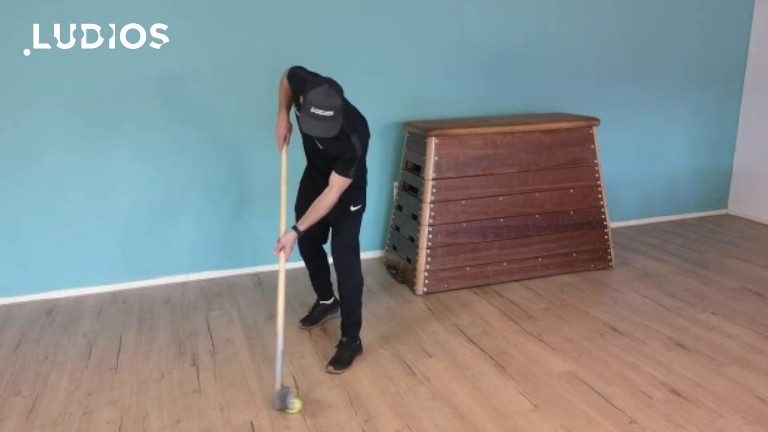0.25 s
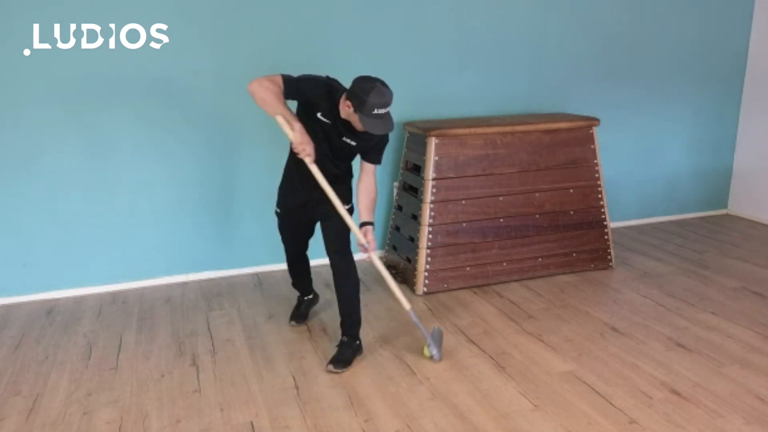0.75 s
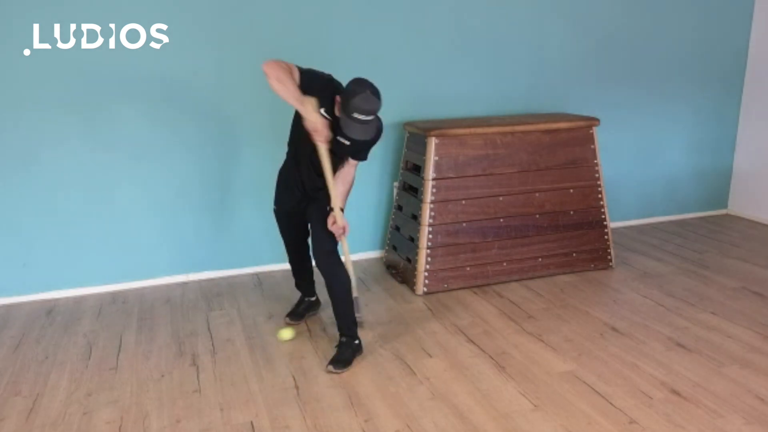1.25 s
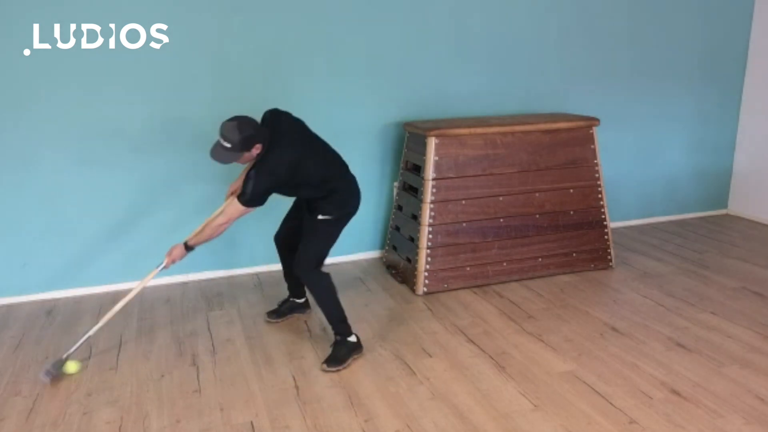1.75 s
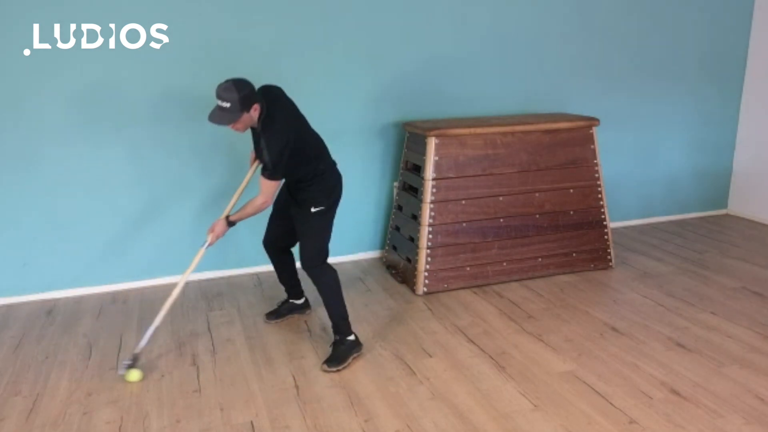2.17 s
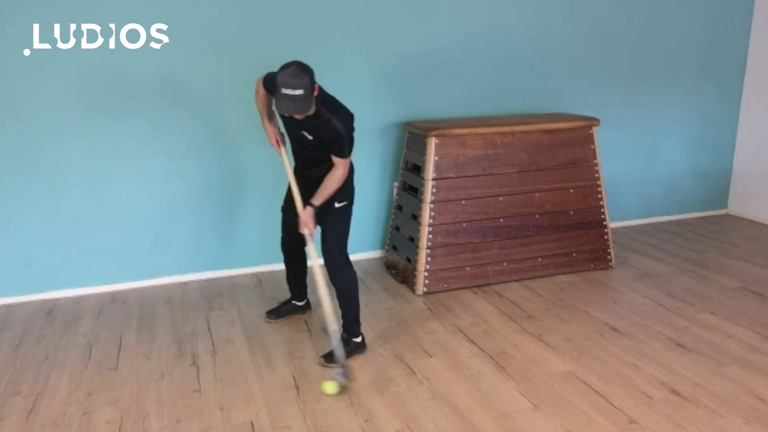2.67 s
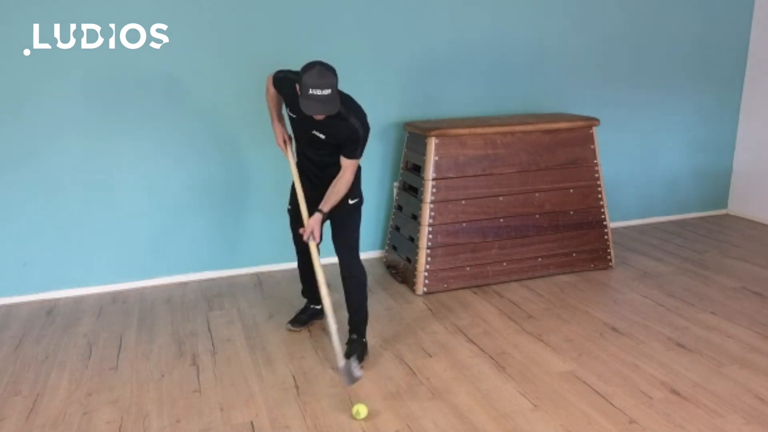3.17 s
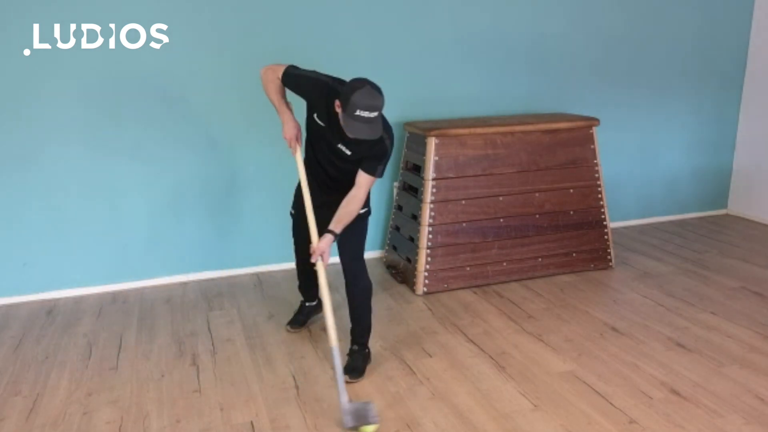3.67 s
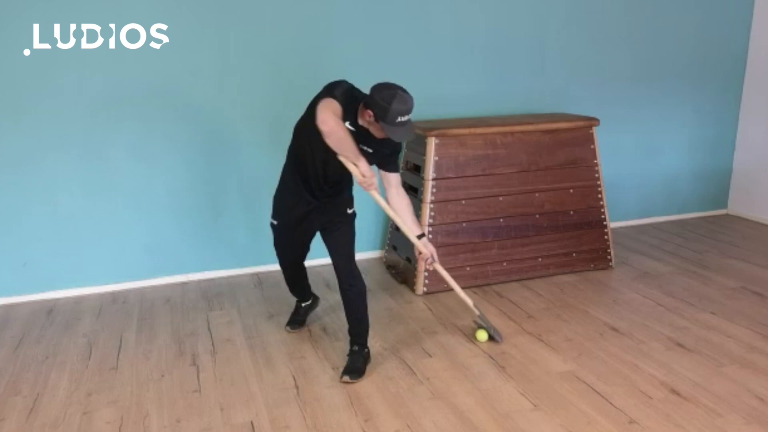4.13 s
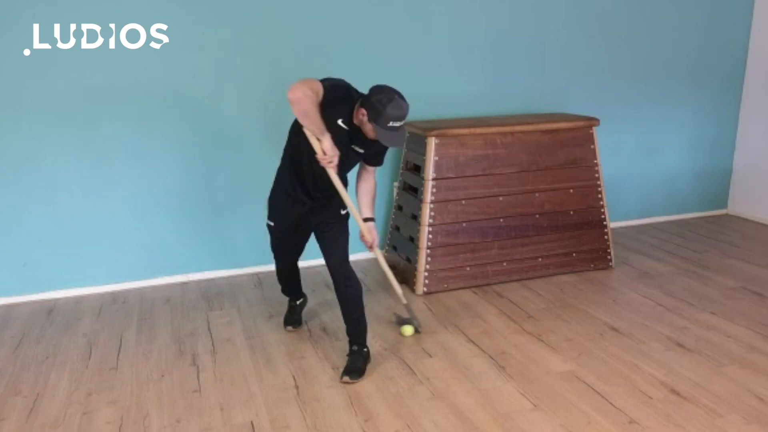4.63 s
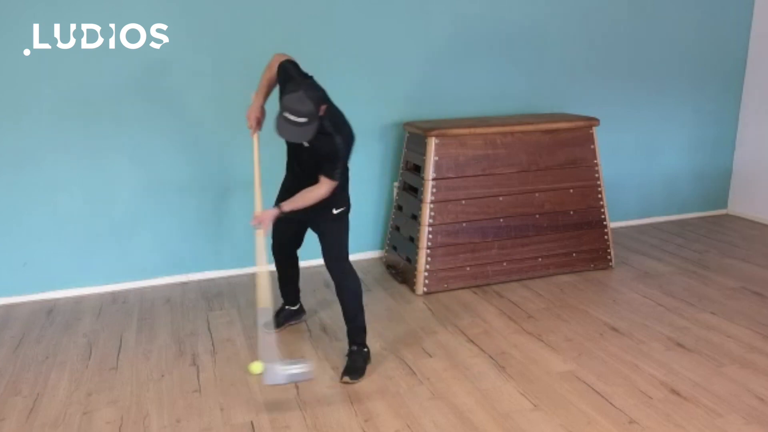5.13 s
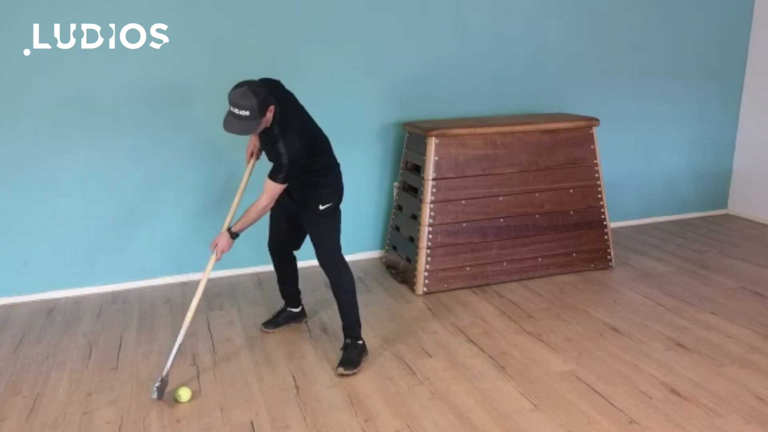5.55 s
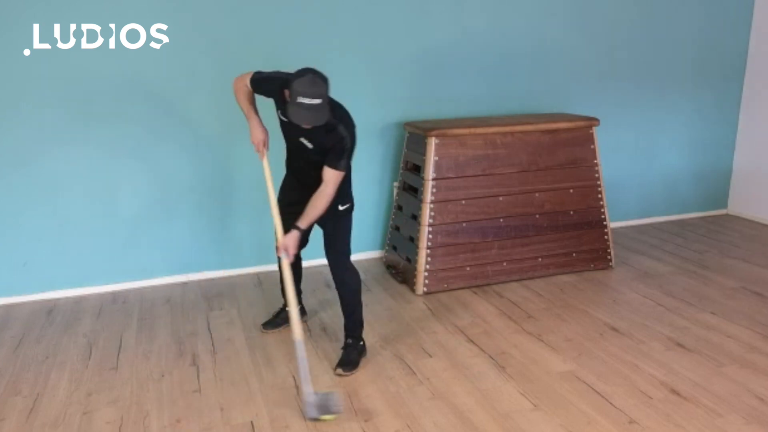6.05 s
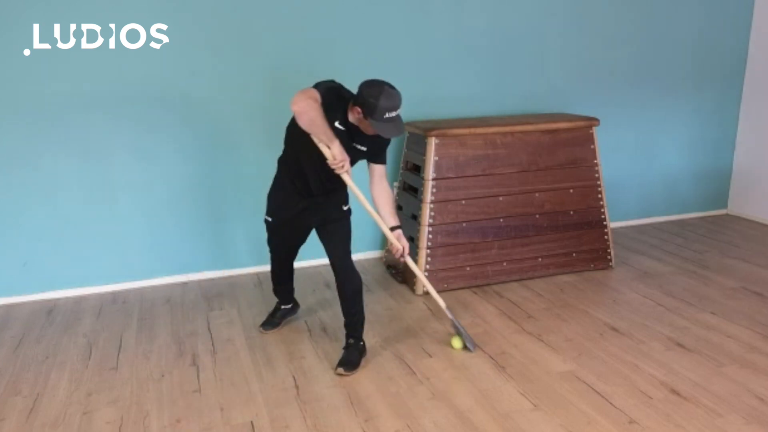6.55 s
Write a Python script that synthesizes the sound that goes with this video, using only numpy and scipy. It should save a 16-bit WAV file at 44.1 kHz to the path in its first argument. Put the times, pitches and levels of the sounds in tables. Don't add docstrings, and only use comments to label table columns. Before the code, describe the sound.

A stick with a hard blade is swept over a laminate floor in a small bare room. Gritty scrapes come in bursts, some hissy, some ringing hollow. A sharp wooden slap lands just before two seconds with heavy thuds around it. More scrapes and dull thumps follow, ending in a strong double scrape that quickly fades. Close stereo microphone, low rumble beneath.

```python
import sys
import numpy as np
from scipy import signal
from scipy.fft import rfft, irfft, next_fast_len
from scipy.io import wavfile
from scipy.ndimage import uniform_filter1d

SR = 44100
rng = np.random.default_rng(int(sys.argv[2]) if len(sys.argv) > 2 else 0)


def voltage_ratio(decibels):
    exponent = np.asarray(decibels, float) / 20
    return 10 ** exponent


def int16_out(signal):
    q = np.round(np.clip(np.atleast_2d(signal).T, -1, 1) * 32767)
    wavfile.write(sys.argv[1], SR, q.astype(np.int16))


N = 299785


def rms_one(x):
    return x / np.sqrt(np.mean(x ** 2) + 1e-20)


def in_time(rows):
    s, *columns = np.transpose(rows)
    return [np.interp(np.arange(N) / SR, s, column) for column in columns]


def at_hz(points, hz):
    table_hz, values = np.transpose(points)
    return np.interp(np.log(hz), np.log(table_hz), values)


def colour(x, spectrum):
    size = next_fast_len(N)
    hz = np.arange(size // 2 + 1) * SR / size + 1
    shaped = rfft(x, size) * voltage_ratio(at_hz(spectrum, hz))
    return rms_one(irfft(shaped, size)[..., :N])


def drift(rate_hz):
    r = np.exp(-2 * np.pi * rate_hz / SR)
    wander = signal.lfilter([1], [1, -2 * r, r * r], rng.standard_normal(N + SR))
    return rms_one(wander[SR:])


def resonance(x, hz, width):
    r = np.exp(-np.pi * width / SR)
    poles = [1, -2 * r * np.cos(2 * np.pi * hz / SR), r * r]
    return signal.lfilter([(1 - r * r) / 2, 0, (r * r - 1) / 2], poles, x)


def body(x, modes, gains=None):
    gains = np.ones(len(modes)) if gains is None else gains
    out = 0
    for k, (hz, width, db) in enumerate(modes):
        out = out + (-1) ** k * voltage_ratio(db) * gains[k] * resonance(x, hz, width)
    return out


def favoured(modes, contact_hz, octaves, flicker_db):
    near = []
    for hz, width, db in modes:
        distance = np.log2(hz / contact_hz) / octaves
        near.append(voltage_ratio(-6 * distance ** 2 + flicker_db * drift(6.7)))
    return near / np.sqrt(np.sum(np.square(near), axis=0))


PORT_SPLIT_HZ = 310


def ports(common, apart):
    highpass = signal.butter(3, PORT_SPLIT_HZ, "high", fs=SR, output="sos")
    apart = signal.sosfilt(highpass, apart)
    return np.array([common + apart, common - apart]) / np.sqrt(2)


BITE_S, FIRST_BITE, SWELL_DB = 0.011, 0.7, 4


def touch(t, start, swell, lift_db_per_s):
    since = np.maximum(t - start, 0)
    bite = (t >= start) * (1 - (1 - FIRST_BITE) * np.exp(-since / BITE_S))
    press_db = -SWELL_DB * np.maximum(1 - since / swell, 0)
    lift_db = -lift_db_per_s * np.maximum(since - swell, 0)
    return (bite * voltage_ratio(press_db + lift_db)) ** 2


GATHER_DB_PER_S = 134


def glide(t, full, hold, lift_db_per_s):
    gather_db = -GATHER_DB_PER_S * np.maximum(full - t, 0)
    lift_db = -lift_db_per_s * np.maximum(t - full - hold, 0)
    return voltage_ratio(gather_db + lift_db) ** 2


# (touch time [s], swell [s], grit level [dB],
# blade ring above grit [dB], contact resonance [Hz])
LANDINGS = [(.878, 0.078, -49, -5, 2180), (0.974, 0.038, -45.5, -7.5, 2370), (1.166, 0.019, -52, 5, 2020),
            (1.77, 0.039, -47.5, 4.5, 1800), (1.934, 0.038, -51, -1, 2720),
            (2.013, 0.02, -46.5, -2.5, 2280), (2.545, 0.037, -59, 5.5, 2020),
            (2.831, 0.0053, -72, -8, 1850), (2.942, 0.014, -63.5, 13.5, 2020), (3.224, 0.008, -70, 6, 2340),
            (3.464, 0.057, -62, -2.5, 2230), (3.83, 0.073, -42, -9, 2780),
            (3.876, 0.055, -39.5, -10.5, 2920), (4.108, 0.091, -42.5, -8, 1850),
            (4.523, 0.082, -44.5, 6.5, 1773), (5.009, 0.0078, -77, 3, 1600),
            (5.397, 0.018, -52.5, -20, 1670), (6.186, 0.052, -40.5, -3.5, 2790),
            (6.246, 0.059, -41.5, -4.5, 2450), (6.503, 0.023, -57, -1, 2400)]
# (full speed time [s], hold [s], grit level [dB],
# blade ring above grit [dB], contact resonance [Hz])
GLIDES = [(0.0, 0.33, -68.5, -10.5, 1960), (0.29, 0.066, -55.5, -1.5, 3300),
          (0.378, 0.047, -43, -6.5, 2180), (0.527, 0.048, -39, -11.5, 2850),
          (1.336, 0.057, -59, 12.5, 1970), (1.452, 0.022, -63, 11, 1880), (1.63, 0.12, -75.5, 6, 2060),
          (2.15, 0.013, -47.5, -4, 2980), (2.094, .02, -61, 4.5, 2480), (2.416, 0.18, -77, 3, 2040),
          (3.078, 0.018, -83, 8, 1980), (3.68, 0.17, -67, -2, 1770), (4.248, 0.21, -53.5, 2, 2160),
          (4.668, 0.063, -46, 0.5, 1813), (4.897, .012, -69, 4.5, 2280), (5.497, 0.046, -65.5, 8, 1960),
          (5.698, 0.071, -56.5, -0.5, 2230), (5.86, 0.14, -71.5, -2.5, 1970),
          (6.092, 0.09, -77.5, -1, 2000), (6.75, .08, -77.5, 4.5, 2130)]
# (touch time [s], swell [s], level [dB])
LEANS = [(0.0, 0.063, -76.5), (.2, 0.073, -69), (.34, 0.076, -60.5), (.49, 0.049, -57.5),
         (0.951, 0.065, -60), (1.166, 0.016, -53.5), (1.29, 0.14, -58), (1.53, .2, -76.5),
         (1.773, 0.054, -48.5), (1.938, 0.24, -63.5), (2.545, .06, -68), (2.83, 0.0045, -60),
         (2.945, 0.015, -66), (3.06, 0.03, -76), (3.465, 0.034, -73), (3.835, 0.048, -59),
         (4.106, .03, -63), (4.14, 0.054, -50.5), (4.27, 0.15, -50.5), (4.45, 0.16, -53),
         (4.6, 0.054, -51.5), (4.86, 0.034, -69), (5.007, 0.0073, -62.5), (5.396, 0.011, -49.5),
         (5.58, 0.11, -67), (6.505, 0.0071, -76)]
LIFT_DB_PER_S, BLADE_LIFT_DB_PER_S, SHAFT_LIFT_DB_PER_S = 194, 206, 172


def pressure():
    t = np.arange(0, N + 16, 16) / SR
    hiss, blade, pitch, shaft = np.full((4, len(t)), 1e-11)
    pitch = pitch * np.log(2000)
    for shape, rows in ((touch, LANDINGS), (glide, GLIDES)):
        for s, length, db, ring_db, hz in rows:
            ring = voltage_ratio(db + ring_db) ** 2 * shape(t, s, length, BLADE_LIFT_DB_PER_S)
            hiss = hiss + voltage_ratio(db) ** 2 * shape(t, s, length, LIFT_DB_PER_S)
            blade = blade + ring
            pitch = pitch + ring * np.log(hz)
    for s, length, db in LEANS:
        shaft = shaft + voltage_ratio(db) ** 2 * touch(t, s, length, SHAFT_LIFT_DB_PER_S)
    hiss_db = 10 * np.log10(hiss)
    blade_db = 10 * np.log10(blade / hiss)
    shaft_db = 10 * np.log10(shaft / hiss)
    return in_time(np.transpose([t, hiss_db, blade_db, shaft_db, np.exp(pitch / blade)]))


# (time [s], level [dB])
RUMBLE = [(0.0, -51), (.55, -49.5), (.8, -53), (1.3, -47.5), (1.7, -47), (1.89, -45.5), (2.2, -51),
          (2.5, -54.5), (2.9, -43.5), (3.3, -51.5), (3.75, -58), (4.35, -46.5), (4.85, -52.5), (5.3, -48.5),
          (5.49, -41.5), (5.95, -65), (6.3, -49.5), (6.8, -54)]
# (frequency [Hz], density [dB per Hz])
RUMBLE_COLOUR = [(10, -14), (22, -3), (33, -4), (46, -3.5), (62, -16), (87, -12), (120, -17), (200, -29),
                 (260, -35), (400, -50), (800, -90)]
# (frequency [Hz], density [dB per Hz])
AIR = [(150, -26), (250, 6), (398, -5.5), (646, -8), (1820, -2.5), (2620, -4.5), (3510, -10), (7510, -11),
       (10200, -21), (14500, -21), (15500, -7)]
AIR_DB, RUMBLE_TRIM_DB, LUMP_DB, PORT_WOBBLE_DB = -72, -3, 0.44, -30
SHAKE_DB = -1.5


def background():
    rumble_db, = in_time(RUMBLE)
    hiss_db = pressure()[0]
    load = uniform_filter1d(voltage_ratio(0.46 * (hiss_db + 41)), size=SR // 12)
    steady = voltage_ratio(rumble_db + RUMBLE_TRIM_DB)
    level = np.hypot(steady, voltage_ratio(SHAKE_DB - 49) * load) * voltage_ratio(LUMP_DB * drift(1.9))
    rumble, wobble = level * colour(rng.standard_normal((2, N)), RUMBLE_COLOUR)
    air = voltage_ratio(AIR_DB + drift(29.0)) * colour(rng.standard_normal((2, N)), AIR)
    heard = ports(np.sqrt(2) * (rumble + air[0]), voltage_ratio(3.5) * air[1] + rumble)
    return heard + voltage_ratio(PORT_WOBBLE_DB) * wobble * [[1], [-1]]


def grit(per_s, spread_db):
    sizes = voltage_ratio(spread_db * np.minimum(rng.exponential(1, N), 5)) * rng.choice([-1, 1], N)
    return rms_one(sizes * (rng.random(N) < per_s / SR))


# (frequency [Hz], density [dB per Hz])
GRIT = [(2000, -48), (3400, -15.5), (3670, -8), (4850, -5), (5210, -2), (6260, -11), (7430, -5),
        (10500, -22.5), (14500, -28), (15600, -32)]
# (frequency [Hz], width [Hz], level [dB])
TIP = [(3830, 1000, 21), (3950, 280, -75), (5370, 233, -39), (6200, 2400, 46), (7200, 4000, 45.5)]
# (frequency [Hz], width [Hz], level [dB])
BLADE = [(1510, 290, 4), (1670, 137, 1.5), (1903, 230, -13), (2190, 47, -3.5), (2450, 590, 2),
         (2573, 236, 9.5), (2816, 118, 8.5), (3213, 174, 11.5)]
# (frequency [Hz], width [Hz], level [dB])
SHAFT = [(546, 247, -0.5), (669, 260, 3.5), (853, 390, 1.5), (1060, 244, 3.5), (1356, 500, -1.5)]
# (time [s], edge resonance [Hz])
TILT = [(0.0, 5370), (.55, 6000), (1.03, 5930), (1.4, 5260), (1.6, 6050), (1.79, 4800), (2.05, 5850),
        (2.2, 5500), (2.6, 6200), (3.0, 5240), (3.55, 6160), (3.9, 5040), (4.12, 7200), (4.42, 4770),
        (4.78, 6500), (5.1, 5750), (5.78, 6590), (6.8, 6000)]


def scrape():
    hiss_db, blade_db, shaft_db, contact_hz = pressure()
    edge_hz, = in_time(TILT)
    fine, edgy, coarse, deep = [grit(per_s=5000, spread_db=3.0) for part in range(4)]
    edge = rms_one(body(edgy, TIP, favoured(TIP, edge_hz, octaves=.25, flicker_db=1.)))
    hiss = rms_one(colour(fine, GRIT) + voltage_ratio(-3) * edge)
    ring = rms_one(body(coarse, BLADE, favoured(BLADE, contact_hz, octaves=.22, flicker_db=1.5)))
    broad = rms_one(resonance(resonance(deep, 2000, 1640), 2000, 1640))
    focus = voltage_ratio(np.clip(0.59 * blade_db + 4.0, -9, 4))
    blade = (focus * ring + broad) / np.sqrt(focus ** 2 + 1)
    shaft = rms_one(body(edgy, SHAFT))
    stroke = hiss + voltage_ratio(blade_db) * blade + voltage_ratio(shaft_db) * shaft
    return voltage_ratio(hiss_db + 1.02 * drift(57)) * stroke


# (time [s], peak level [dB], hardness [dB], boom [dB], fade t60 [s])
THUMPS = [(0.562, -48, 15.5, -6, 0.17), (1.02, -62, 10, -10, 0.39), (1.172, -48.5, -1, -21, 1),
          (1.773, -33, 5, -24, 0.33), (1.787, -43, 13.5, 11, 1), (1.811, -37.5, -11, 10.5, 0.16),
          (1.866, -47, -15, 14.5, 0.28), (2.04, -44, 0, 6.5, 0.13), (2.838, -49, -5, 7, 0.21),
          (2.93, -44, -7, -21, 0.41), (3.224, -56.5, -14, -16, 0.47), (3.537, -49.5, 7, -9, 0.59),
          (4.166, -41, 11, -3, 1), (4.705, -42, 10.5, 4, 0.1), (5.011, -36, -8.5, -27, 0.26),
          (5.04, -45.5, -20, -16, 0.35), (5.399, -36.5, -27, -11, 0.26), (5.426, -45, -25, 1, 0.3),
          (5.458, -52.5, -11, 13.5, 0.39), (5.776, -49, 6.5, -12, 0.41)]
# (frequency [Hz], width [Hz], level [dB])
BOARDS = [(128.6, 8.5, -3), (182, 54, -3), (225, 34, 2.5), (292, 61, 0.5), (384, 33, 1.5), (536, 190, -7)]
# (frequency [Hz], width [Hz], level [dB])
JOISTS = [(52, 10, -4), (87, 9, 2), (118, 14, -3)]


def thumps():
    low, boom, knock = np.zeros((3, N))
    t = np.arange(int(.5 * SR)) / SR
    for s, db, hard_db, boom_db, t60 in THUMPS:
        at = round(s * SR)
        span = slice(at, at + len(t))
        rattle = rng.standard_normal(len(t)) * voltage_ratio(-60 * t / t60 - 16)
        push = 0.85 * np.exp(-t / 0.0016)
        shove = t / 0.0065 * np.exp(-t / 0.0077)
        tap = rattle * np.exp(-t / 0.15) - 1.74 * np.exp(-t / 0.00035)
        low[span] += voltage_ratio(db) * (rattle + push)
        boom[span] += voltage_ratio(db + boom_db) * shove
        knock[span] += voltage_ratio(db + hard_db) * tap
    blows = voltage_ratio(13.5) * body(low, BOARDS) + voltage_ratio(4) * resonance(knock, 1890, 1900)
    return blows, voltage_ratio(19.0) * body(boom, JOISTS)


# (peak level [dB], frequency [Hz], width [Hz])
CRACK = (-14, 1150, 1100)
CRACK_S = 1.7872


def crack():
    db, hz, width = CRACK
    click = np.zeros(N)
    click[round(CRACK_S * SR)] = -voltage_ratio(db + 9.0)
    return resonance(resonance(click, hz, width), hz, width)


# (frequency [Hz], t60 [s])
ROOM_T60 = [(100, 0.4), (500, 0.17), (2000, 0.094), (8000, 0.15)]


def room(x, direct_db):
    hop, places = SR // 16, 30
    t = np.arange(int(.3 * SR)) / SR
    edges = 40 * 2.0 ** np.arange(0, 9.1)
    white = rng.standard_normal((2, places, len(t)))
    tails = 0
    for low, high in zip(edges, edges[1:]):
        t60 = at_hz(ROOM_T60, np.sqrt(low * high))
        bandpass = signal.butter(1, [low, high], "band", fs=SR, output="sos")
        tails = tails + signal.sosfilt(bandpass, white) * voltage_ratio(-60 * t / t60) / np.sqrt(t60)
    tails = tails * (1 - np.exp(-t / 0.00053))
    tails = ports(*tails / np.sqrt(np.mean(np.sum(tails[0] ** 2, axis=1))))
    tails[0, :, 8] += voltage_ratio(direct_db)
    tails[1, np.arange(places), rng.integers(3, 14, places)] += voltage_ratio(direct_db)
    padded = np.pad(x, (hop, 3 * hop))
    out = np.zeros((2, N + 5 * hop + len(t)))
    for k in range(N // hop + 2):
        start, stop = k * hop, (k + 2) * hop
        piece = padded[start:stop] * np.hanning(2 * hop) ** .6
        out[:, start:stop + len(t) - 1] += signal.fftconvolve(piece[None], tails[:, k % places], axes=1)
    return out[:, hop:hop + N]


def scene():
    blows, boom = thumps()
    return voltage_ratio(2) * room(scrape() + blows, direct_db=-6) + boom + crack() + background()


def low_pass(x):
    return signal.sosfilt(signal.butter(12, 15700, fs=SR, output="sos"), x)


def record(dry):
    lowpass = signal.cheby2(12, 60, 15900, fs=SR, output="sos")
    mix = signal.sosfilt(lowpass, dry)
    return low_pass(mix)


dry = scene()
out = record(dry)
int16_out(out)
```